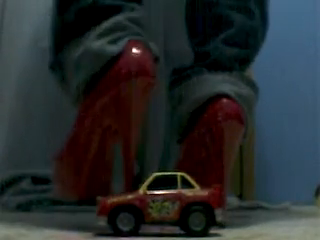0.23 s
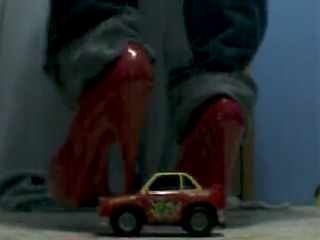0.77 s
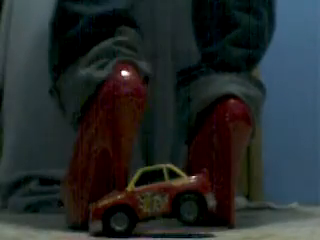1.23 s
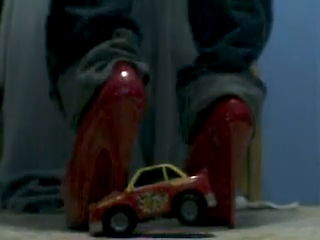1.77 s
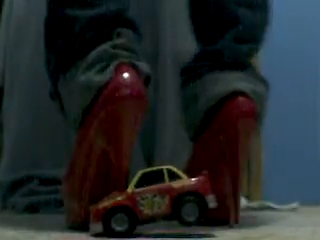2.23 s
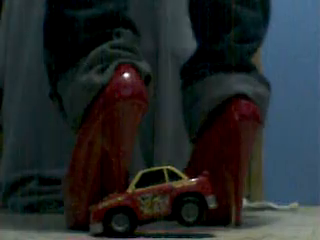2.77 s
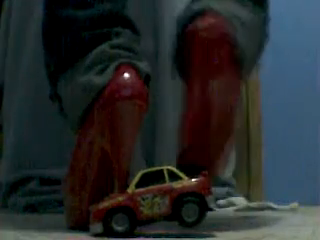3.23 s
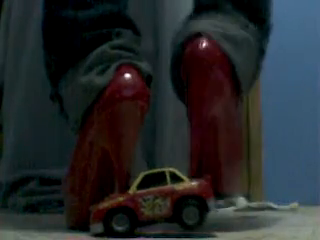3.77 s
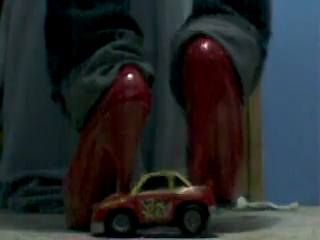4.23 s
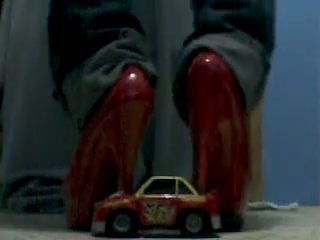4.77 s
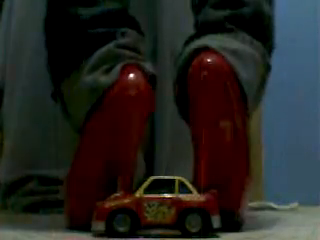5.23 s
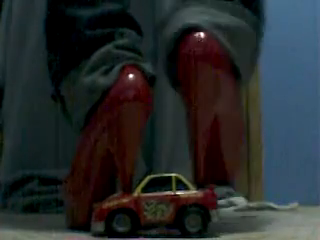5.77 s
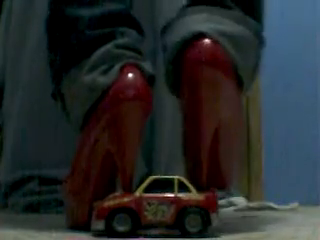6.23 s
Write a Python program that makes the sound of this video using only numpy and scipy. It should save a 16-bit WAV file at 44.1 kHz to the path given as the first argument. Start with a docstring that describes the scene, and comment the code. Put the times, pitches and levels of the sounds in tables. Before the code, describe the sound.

A constant coarse, gritty hiss with weak low rumble runs from start to end, in a small room with the microphone on the floor. Barely audible soft steps come at 0.1 to 0.25 s. At 0.45 s a heel knocks moderately, with a slight plastic rattle. A light tap at 0.59 s leads straight into the main event at 0.62 s: a heavy stamp, booming and overloaded, with a hard heel click. A plastic toy car chatters dryly, then rocks in a few quickly weakening clacks until about 0.8 s, while a short room tail fades. Faint weight shifts follow at 0.8 and 1.5 to 1.75 s. Small dull taps come at 3.2 and 3.5 s, a tiny tick at 3.9 s, and a crisper light heel tap around 4.0 s. A soft low thud lands at 4.55 s. Almost only hiss remains, with barely perceptible shifts until about 6.35 s.

```python
"""High-heeled shoes step about on a hard floor in a small room, near a microphone that lies on the floor.
Low rumble runs throughout; a coarse converter's rounding turns it into a steady gritty hiss.
Soft steps come first, then a shoe stamps down, overloads the input and jolts a plastic toy car, which clatters
and rocks to rest; then the heels shift with light taps and soft thuds. Each contact is a short rough force
that excites decaying modes of floor, sole, heel or car; a diffuse room tail follows."""
import sys
import numpy as np
from scipy import signal
from scipy.fft import rfft, irfft
from scipy.io import wavfile

SR = 44100
rng = np.random.default_rng(int(sys.argv[2]) if len(sys.argv) > 2 else 0)


def put_to_file(sound):
    """Save the sound as 16-bit audio at rate SR, in the file named by the first command-line argument."""
    columns = np.atleast_2d(sound).T  # one column per channel
    safe = np.clip(columns, -1, 1)
    whole_steps = np.round(safe * 32767)
    wavfile.write(sys.argv[1], SR, whole_steps.astype(np.int16))


N = 286738   # samples
CUTOFF_HZ = 7650   # upper band limit of the rumble and of the converter's output


def from_db(db):
    """Decibel law: 20 dB is a factor of ten in amplitude."""
    return 10 ** (np.asarray(db) / 20)


def unit_energy(x):
    """Energy normalisation: the squares sum to one."""
    return x / np.sqrt(np.sum(x ** 2) + 1e-20)


def at_hz(points, hz, axis=1):
    """Interpolation of one table column on a logarithmic frequency axis."""
    points = np.array(points)
    return np.interp(np.log(hz), np.log(points[:, 0]), points[:, axis])


def dying(t, t60):
    """Exponential decay: the amplitude falls by 60 dB in t60 seconds."""
    return np.exp(-np.log(1000) * t / t60)


def contacts(times, levels_db, modes, grit, grit_s, scatter, centres_hz=None, q=1):
    """Modal excitation: a push and a crunch of tiny slips set a body ringing; levels are rms over 10 ms."""
    t = np.arange(SR // 5) / SR
    out = np.zeros(N + len(t))
    hz, mode_db, t60 = np.transpose(modes)[:, :, None]
    signs = (-1) ** np.arange(len(modes))[:, None]
    for k, (s, db) in enumerate(zip(times, levels_db)):
        crunch = rng.standard_normal(len(t)) * dying(t, grit_s)
        force = grit * unit_energy(crunch)
        force[0] += 1   # the push
        if centres_hz is not None:   # the hardness of the contact favours one band
            force = signal.lfilter(*signal.iirpeak(centres_hz[k], q, fs=SR), force)
        # the load on the body shifts its modes
        pitches = hz * (1 + scatter * rng.standard_normal(hz.shape))
        partials = from_db(mode_db) * np.sin(2 * np.pi * pitches * t) * dying(t, t60)
        ring = np.sum(signs * partials, axis=0)
        struck = unit_energy(signal.fftconvolve(force, ring)[:len(t)])
        at = int(s * SR)
        out[at:at + len(t)] += from_db(db) * struck
    return out[:N] * np.sqrt(SR / 100)   # unit energy becomes unit rms over 10 ms


# spectrum of room rumble and faint microphone noise: (frequency [Hz], relative density [dB per Hz])
RUMBLE_SPECTRUM = [(4, 12), (12, 5), (25, -2.5), (50, -3), (90, -13), (140, -15), (200, -9.5), (320, -14),
                   (440, -18.5), (600, -19), (780, -22.5), (1100, -28.5), (3000, -31.5), (7200, -35)]
RUMBLE_DB = -53.5   # rms


def rumble():
    """Spectral shaping of noise: slowly wandering room rumble thins out to faint microphone noise."""
    hz = np.maximum(np.fft.rfftfreq(N, 1 / SR), 1)
    passed = (hz > 2) & (hz < CUTOFF_HZ)
    spectrum = rfft(rng.standard_normal(N)) * from_db(at_hz(RUMBLE_SPECTRUM, hz)) * passed
    return from_db(RUMBLE_DB) * np.sqrt(N) * unit_energy(irfft(spectrum, N))


# modes of the floor, shared with the heel strikes: (frequency [Hz], relative level [dB], t60 [s])
FLOOR_MODES = [(52.05, -2.5, 0.091), (74.2, 2.5, 0.057), (130, -1.5, 0.059), (178.3, -13, 0.095),
               (228, -11, .055), (297, -17.5, 0.084)]
# modes of the shoe sole, shared likewise: (frequency [Hz], relative level [dB], t60 [s])
SOLE_MODES = [(346, -1, 0.038), (478, -2.5, 0.037), (608, -5, 0.056), (752, -5, 0.019), (903, -3, 0.024),
              (1033.5, -10, 0.024), (1437, -12.5, 0.022)]
SOLE_Q = 1.3
# weight shifts onto a sole: (time [s], floor thud [dB], sole knock [dB])
SOFT_STEPS = [(0.117, -51, -51), (0.196, -50, -52.5), (0.212, -51, -56.5), (0.251, -55, -52.5),
              (0.815, -41, -58.5), (0.849, -40, -46.5), (1.535, -45, -53.5), (1.647, -49, -49.5),
              (1.711, -41, -40.5), (1.754, -42, -39), (2.326, -44.5, -59), (2.597, -52.5, -62),
              (3.735, -60, -56), (4.546, -29, -49), (5.120, -50.5, -65), (5.226, -64, -57),
              (5.376, -50.5, -60.5), (5.570, -61, -56), (6.349, -47, -53.5)]
# the more a step knocks rather than thuds, the higher it sounds
SOFT_KNOCK_HZ, KNOCK_DB_PER_OCTAVE = 543, 26


def soft_steps():
    """Low-frequency modal excitation: the sole alone presses down with a thud and a dull knock."""
    s, thud_db, knock_db = np.transpose(SOFT_STEPS)
    knock_hz = SOFT_KNOCK_HZ * 2 ** ((knock_db - thud_db) / KNOCK_DB_PER_OCTAVE)
    thud = contacts(s, thud_db, FLOOR_MODES, grit=0.73, grit_s=0.14, scatter=0.022)
    knock = contacts(s, knock_db, SOLE_MODES, grit=0.82, grit_s=0.05, scatter=.015,
                     centres_hz=knock_hz, q=SOLE_Q)
    return knock - thud   # opposite polarity


# the shoe touches again as it settles, weaker each time: (share of the settling time)
SETTLE_SHARES = [0, .22, .55, 1]
THUD_LOSS_DB, KNOCK_LOSS_DB, CLICK_LOSS_DB = 8.5, 3, 2.44   # per touch


def settling(s, settle_s, thud_db, knock_db, knock_hz, click_db, click_hz):
    """Repeated impact with energy loss: rows of (s, thud dB, knock dB, knock Hz, click dB, click Hz)."""
    touches = []
    for k, share in enumerate(SETTLE_SHARES):
        touches.append((s + share * settle_s, thud_db - k * THUD_LOSS_DB,
                        knock_db - k * KNOCK_LOSS_DB, knock_hz,
                        click_db - k * CLICK_LOSS_DB, click_hz))
    return touches


# modes of the thin heel, shared with the tip ticks: (frequency [Hz], relative level [dB], t60 [s])
HEEL_MODES = [(2800, -2.5, 0.01004), (3235, -2, 0.013), (3620, 3.5, 0.014), (3930, 0, 0.014),
              (4140, -8, 0.0043), (6330, -7, 0.0085), (7370, -9, 0.0034)]
# a heel comes down, from light tap to heavy stamp: (time [s], settling time [s], floor thud [dB],
# sole knock [dB], knock centre [Hz], tip click [dB], click centre [Hz])
HEEL_STRIKES = [(0.446, 0.011, -18, -23.5, 648, -32.5, 5800), (0.5864, .002, -38, -37, 516, -35.5, 6160),
                (0.621, .036, -0.5, -13, 580, -14.5, 5554), (3.2256, 0.0037, -37, -41.5, 600, -58.5, 3650),
                (3.461, .022, -39, -48, 850, -62.5, 3300), (3.506, 0.0018, -41.5, -37, 1133, -50, 3700),
                (4.0282, 0.0044, -34.5, -37, 1150, -32.5, 3500)]


def heel_strikes():
    """Modal excitation of three bodies: weight thumps the floor, the sole knocks, the thin heel clicks."""
    touches = [touch for strike in HEEL_STRIKES for touch in settling(*strike)]
    s, thud_db, knock_db, knock_hz, click_db, click_hz = np.transpose(touches)
    thud = contacts(s, thud_db, FLOOR_MODES, grit=0.52, grit_s=0.11, scatter=.015)
    knock = contacts(s, knock_db, SOLE_MODES, grit=0.68, grit_s=0.073, scatter=0.023,
                     centres_hz=knock_hz, q=SOLE_Q)
    click = contacts(s, click_db, HEEL_MODES, grit=1.1, grit_s=0.027, scatter=.02,
                     centres_hz=click_hz, q=1.2)
    return knock + click - thud


# modes of the plastic car: (frequency [Hz], relative level [dB], t60 [s])
CAR_MODES = [(764, -2.5, 0.02), (1241, -2.5, .009), (1556, -2, 0.011), (2000, -3.5, 0.0073),
             (2380, -3.5, 0.0073), (2965, -7, 0.02), (3210, -3.5, 0.0059), (3840, -2, 0.018),
             (4120, -8.5, .006), (6480, -12.5, 0.0023)]
# the shoe jolts the car and its loose parts chatter: (time [s], length [s], level [dB])
JOLTS = [(0.4557, .017, -27.5), (0.628, .01, -12), (0.6547, .03, -16.5)]
CHATTER_GAP_S, CHATTER_LOSS_DB, CHATTER_HZ = 0.0059, 0.44, 2250   # loss per bounce
BUZZ_S = .025   # t60 of the buzz at each bounce


def toy_car():
    """Chattering impacts: loose plastic parts buzz briefly at every bounce, then the car rocks."""
    bounces = []
    for s, length, db in JOLTS:
        for k, delay in enumerate(np.arange(0, length, CHATTER_GAP_S)):
            bounces.append((s + delay, db - k * CHATTER_LOSS_DB, CHATTER_HZ))
    s, level_db, centre_hz = np.transpose(bounces + rocking(count=4))
    return contacts(s, level_db, CAR_MODES, grit=3.8, grit_s=BUZZ_S, scatter=0.096,
                    centres_hz=centre_hz, q=0.71)


# each gap is longer than the last by the slowing ratio
ROCK_START_S, ROCK_GAP_S, ROCK_SLOWING = .6955, .0208, 1.15
ROCK_DB, ROCK_LOSS_DB, ROCK_HZ = -24, 4, 1738   # loss per landing


def rocking(count):
    """Damped rocking: wheels land in turn, slower and weaker; rows of (s, dB, centre Hz)."""
    landings = []
    for k in range(count):
        elapsed_s = ROCK_GAP_S * np.sum(ROCK_SLOWING ** np.arange(k))
        landings.append((ROCK_START_S + elapsed_s, ROCK_DB - k * ROCK_LOSS_DB, ROCK_HZ))
    return landings


# a heel tip grazes the floor: (time [s], level [dB], centre frequency [Hz])
TIP_TICKS = [(1.851, -64, 3730), (3.8827, -48, 5330), (3.997, -42.5, 3670)]


def tip_ticks():
    """Selective modal excitation: with no weight on it only the heel rings."""
    s, level_db, centre_hz = np.transpose(TIP_TICKS)
    return contacts(s, level_db, HEEL_MODES, grit=1.1, grit_s=0.018, scatter=0.029,
                    centres_hz=centre_hz, q=2.1)


# the room's tail: (frequency [Hz], level against the direct sound [dB], t60 [s])
ROOM_TAIL = [(60, -19, 0.13), (200, -10, 0.31), (500, -6.5, 0.27), (1010, -2, 0.28), (2120, -10, 0.11),
             (3004, -11, 0.17), (3800, -9, 0.3), (7000, -9, 0.18)]


def room(x, build_s):
    """Diffuse reverberation: dense reflections build up in milliseconds and die away band by band."""
    t = np.arange(2 * SR // 3) / SR
    edges = np.geomspace(40, 9000, 13)
    build_up = 1 - np.exp(-(t / build_s) ** 2)
    tail = 0
    for low, high in zip(edges, edges[1:]):
        hz = np.sqrt(low * high)
        band_pass = signal.butter(2, [low, high], "band", fs=SR, output="sos")
        band = signal.sosfilt(band_pass, rng.standard_normal(len(t)))
        band = unit_energy(band * dying(t, at_hz(ROOM_TAIL, hz, axis=2)) * build_up)
        # energy in proportion to bandwidth
        tail = tail + band * from_db(at_hz(ROOM_TAIL, hz)) * np.sqrt(2 * (high - low) / SR)
    return signal.fftconvolve(x, tail)[:N]


TICK_ROOM_DB, CAR_ROOM_DB = -5.5, -10   # what each sends to the room, against the steps


def scene():
    """Direct-to-reverberant balance: the car is right by the microphone and light ticks barely stir the
    room, so both are drier than the steps."""
    steps = heel_strikes() + soft_steps()
    ticks = tip_ticks()
    car = toy_car()
    to_room = steps + from_db(TICK_ROOM_DB) * ticks + from_db(CAR_ROOM_DB) * car
    reflections = room(to_room, build_s=.008)
    return (steps + ticks + car + reflections + rumble())[None]


INPUT_OFFSET = .037   # of full scale
CONVERTER_HZ, CONVERTER_STEP = 16000, 1 / 512   # sampling rate; step of full scale


def record(dry):
    """Quantisation and clipping: an off-zero input overloads on the stamp, coarse steps turn the rumble
    into a gritty hiss, and the top is cut."""
    sampled = signal.resample(dry + INPUT_OFFSET, round(N * CONVERTER_HZ / SR), axis=1)
    clipped = np.clip(sampled, -.93, .93)
    stepped = np.round(clipped / CONVERTER_STEP) * CONVERTER_STEP
    smooth = signal.resample(stepped - INPUT_OFFSET, N, axis=1)
    low_pass = signal.cheby1(12, .2, CUTOFF_HZ, fs=SR, output="sos")
    return INPUT_OFFSET + signal.sosfilt(low_pass, smooth)   # the offset remains in the output


dry = scene()
out = record(dry)
put_to_file(out)
```